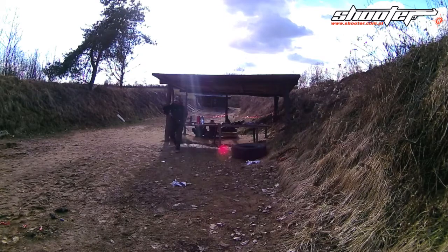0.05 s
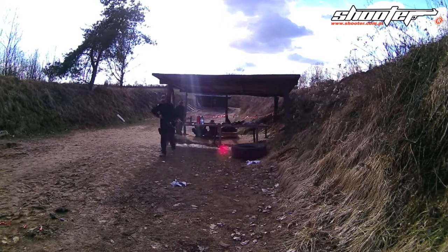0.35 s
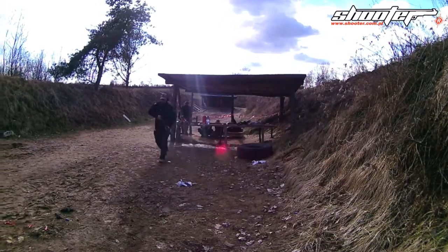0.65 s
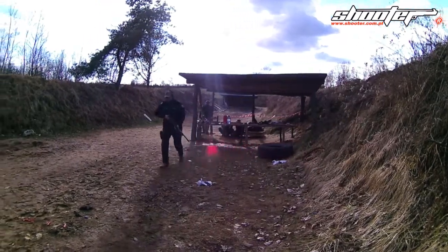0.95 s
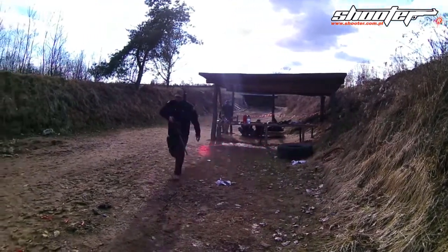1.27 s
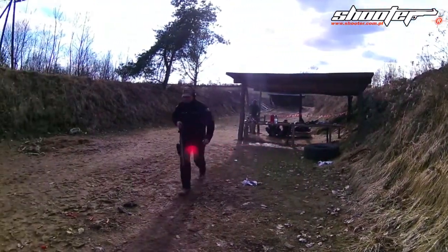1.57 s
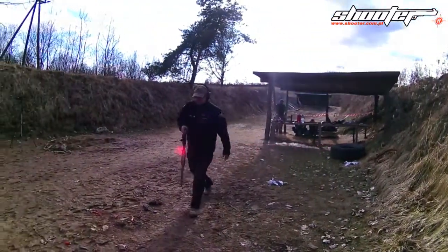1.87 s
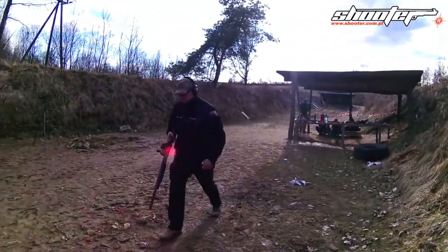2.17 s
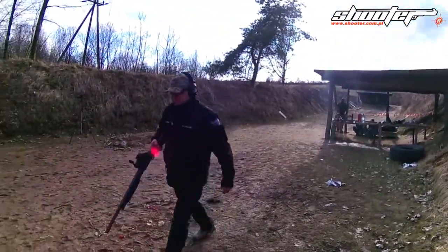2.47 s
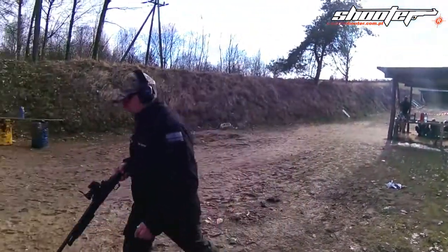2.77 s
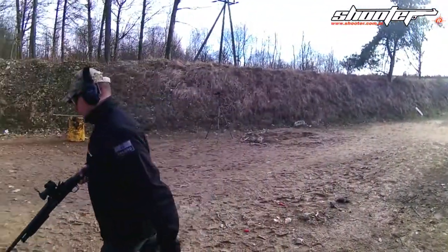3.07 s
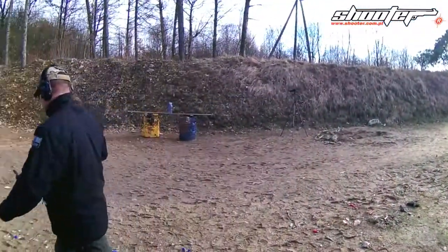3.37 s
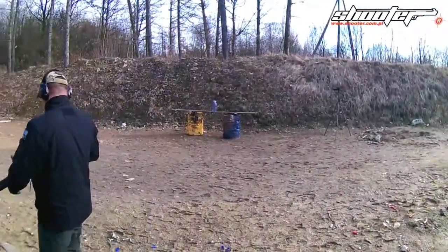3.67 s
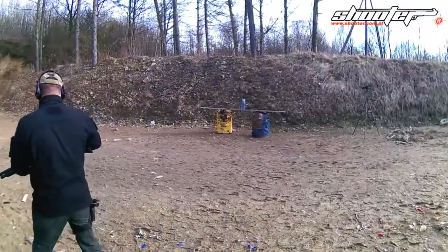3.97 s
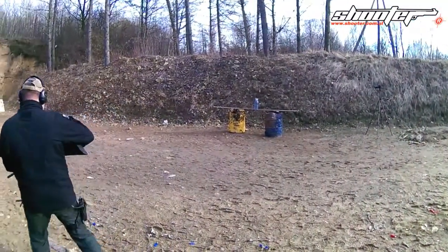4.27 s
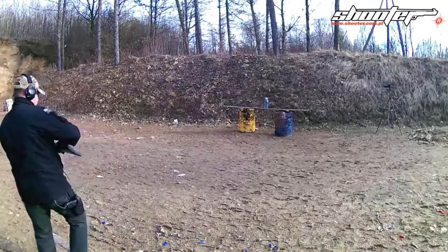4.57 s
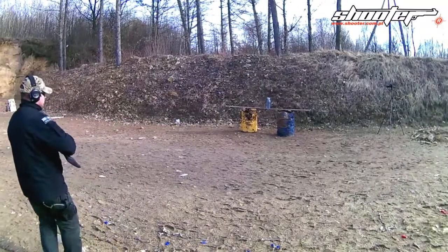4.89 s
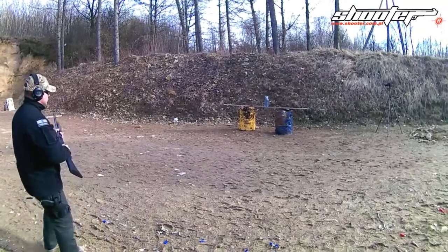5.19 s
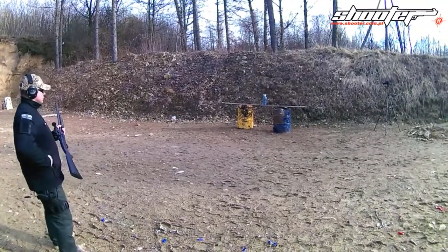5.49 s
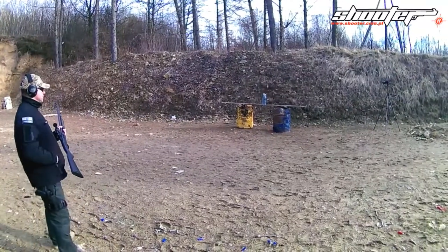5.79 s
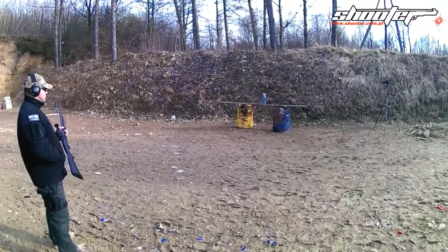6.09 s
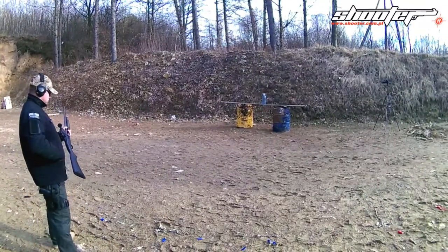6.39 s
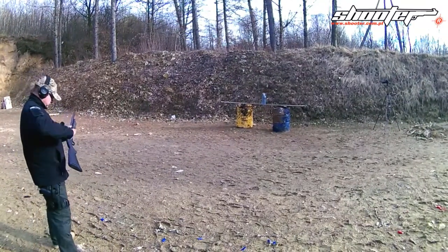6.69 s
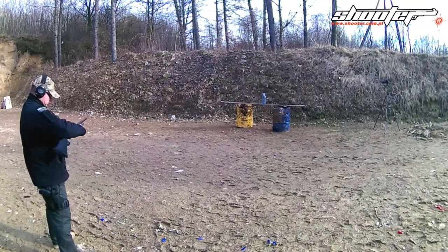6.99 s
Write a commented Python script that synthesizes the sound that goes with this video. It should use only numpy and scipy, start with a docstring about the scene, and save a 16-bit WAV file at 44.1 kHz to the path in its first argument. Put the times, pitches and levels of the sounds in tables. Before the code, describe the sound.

Outdoors, a rubbing camera mount ticks irregularly over faint gritty footsteps, followed by a few dull clacks of a pump-action gun.

```python
"""A quiet outdoor range: a man walks over crunching grit past a turning camera, then handles a shotgun.
The camera's mount rubs, sticks and slips in sharp ticks, and its stand bumps as the turn stops.
The man's heels thud, then the pump-action gun clacks: each blow makes a solid body ring briefly.
Cloth rustles, rubbing parts squeak, and mount and gun give small dry clicks. Underneath lie still air,
a breeze's low rumble, a far machine's hum, the camera's thin whine and a faint, high fizz."""
import sys
import numpy as np
from scipy import signal
from scipy.fft import rfft, irfft
from scipy.io import wavfile
from scipy.ndimage import uniform_filter1d

SR = 44100
rng = np.random.default_rng(int(sys.argv[2]) if len(sys.argv) > 2 else 0)


def materialize(psi):
    """Save the field psi as 16-bit PCM at rate SR to the path in sys.argv[1].

    A 1-D psi becomes a single channel; in a 2-D psi each row is a channel.
    """
    bounded = np.clip(np.atleast_2d(psi).T, -1, 1)
    quanta = np.round(bounded * 32767).astype(np.int16)
    wavfile.write(sys.argv[1], SR, quanta)


N = 310464

# tone colour of still air, the breeze's rumble and the rubbing mount (f/Hz, relative level/dB)
AIR_COLOUR = [(59, -21.5), (100, -1), (304, -7), (407, -10.5), (492, -10), (535, -13.5), (582, -14),
              (718, -15.5), (797, -14), (2050, -22.5), (12200, -31), (15000, -30)]
RUMBLE_COLOUR = [(11, -28), (18, -1.5), (54, -2), (67, 2.5), (86, -14.5), (130, -20), (170, -42),
                 (290, -120)]
DRAG_COLOUR = [(250, -9), (400, 1), (850, -5.5), (1400, -8), (3000, -9), (5100, -19), (6500, -22),
               (12000, -27)]
# tones of a far machine (f/Hz, level/dB)
HUM_TONES = [(53.8, -68.5), (103, -68)]
# rustles of jacket and sling (t/s, half length/s, low f/Hz, high f/Hz, level/dB)
RUSTLES = [(.09, 0.016, 150, 490, -59.5), (.33, 0.011, 400, 1500, -56.5), (1.72, .02, 2100, 3300, -64),
           (3.7, 0.044, 395, 2630, -56), (4.13, 0.06, 560, 1500, -59), (5.27, 0.07, 1300, 2880, -69),
           (6.3, 0.034, 500, 2100, -63), (6.9, 0.23, 1000, 2130, -69.5)]
# crunches of grit (t/s, f/Hz, level/dB)
CRUNCHES = [(.1, 3250, -62), (.33, 3160, -62.5), (1.167, 5170, -61.5), (1.47, 5700, -61.5),
            (1.77, 6950, -68.5), (2.09, 5000, -69.5), (2.43, 6500, -62.5), (2.534, 4240, -47.5),
            (2.735, 7500, -63.5), (3.087, 7000, -55), (3.437, 6800, -60)]
# squeaks of rubbing parts (t/s, half length/s, f/Hz, relative level/dB)
SQUEAKS = [(.135, 0.043, 1890, -66), (0.365, 0.078, 1880, -68), (3.7, 0.028, 398, -54),
           (5.645, .025, 1135, -67), (5.848, .04, 1135, -65.5), (6.35, 0.013, 546, -55.5),
           (6.526, 0.011, 530, -59)]
# the four pitch ranges of a blow: thud, clack, ring, crack (low f/Hz, high f/Hz)
RANGES = [(120, 700), (700, 1400), (1400, 2400), (2400, 9000)]
# slips of the mount and knocks of the gun (t/s, level/dB, brightness/dB: crack's gain over thud)
MOUNT_TICKS = [(.43, -59, 2), (.468, -33.5, 9.5), (.538, -41.5, 2.5), (.878, -37, 1.5), (1.553, -37, 2),
               (1.621, -44.5, -0.5), (2.2562, -40, -2.5), (2.3484, -54, -6), (2.4364, -43, -3.5),
               (2.524, -44, -2.5), (2.5771, -43.5, -1), (2.731, -39.5, -1), (2.8012, -44.5, 1.5),
               (3.019, -40, -1.5)]
GUN_CLACKS = [(5.0419, -48, -5), (5.1469, -48, 5.5), (5.2002, -52.5, -2), (5.2282, -52.5, 6.5),
              (5.3559, -33.5, -0.5), (5.396, -61, 18)]
# make-up of an ordinary tick and of the gun's hardest knock (thud/dB, clack/dB, ring/dB, crack/dB)
MOUNT_BALANCE = [0, -4.5, -3.5, -7.5]
GUN_BALANCE = [0, -3, -13, -18]
# small dry clicks, mostly of the camera's mount and the handled gun (t/s, f/Hz, peak level/dB)
CLICKS = [(.616, 1390, -46), (.799, 950, -49), (2.102, 2200, -47.5), (2.3496, 1130, -32),
          (2.758, 3000, -42), (2.919, 3100, -49), (3.725, 885, -43), (5.6235, 1200, -44.5),
          (6.7909, 1710, -44)]
# bump of the stand (t/s, thud/dB, clack/dB, ring/dB, crack/dB)
STAND_BUMPS = [(3.4255, -39.5, -42, -49, -62)]
# tones of the camera's electronics (start t/s, end t/s, f/Hz, relative level/dB)
WHINE_TONES = [(3.43, 4.66, 13157, -80), (3.43, 4.66, 14497, -82), (4.66, 7.1, 15478, -79.5)]
# the man sets his feet down (t/s, level/dB)
HEEL_THUDS = [(3.793, -51.5), (3.855, -57), (3.893, -61)]
# modes, the tones a struck body rings with: mount's shell, stand, heel on earth, gun's stock and frame
# (f/Hz, relative level/dB, time to fade by 60 dB/s)
MOUNT_MODES = [(295, -21, 0.043), (327, -2.5, 0.064), (382.8, 4.5, 0.041), (473, -3, 0.055),
               (573, -32, 0.24), (653, -13.5, 0.093), (831.5, 4, 0.059), (1045, 8.5, 0.036),
               (1123, -9.5, 0.11), (1330, -2, 0.014), (1470, 1, 0.022), (1894, 2, 0.043),
               (1988, 11.5, 0.0098), (2600, -14, 0.0051), (2890, -9.5, 0.046), (3225, 13, 0.008),
               (3776, -7, 0.028), (4415, 0.5, 0.015), (4680, -1.5, 0.015), (6020, -14, 0.018),
               (7030, -22, 0.011)]
STAND_MODES = [(178, -14.5, 0.37), (203, 2.5, 0.066), (336, -5, 0.11), (407, -2.5, 0.1), (521, -8, 0.13),
               (773, -8, .04), (920, 3, 0.049), (1460, -3, 0.036), (1650, 1, 0.026), (1990, 7, 0.013),
               (2830, 0, 0.015)]
HEEL_MODES = [(173, -3.5, 0.12), (205, 2.5, 0.05)]
GUN_MODES = [(236, 3, 0.076), (266.4, 4.5, 0.075), (400, -11.5, 0.17), (471.6, 4, .08), (611, 5.5, 0.045),
             (646, -17.5, 0.27), (754, -10, 0.083), (787, -4, 0.041), (1060, 3.5, 0.036),
             (1127, 3.5, 0.041), (1638, -10.5, 0.048), (1956, -7.5, 0.041), (2110, -2.5, 0.019),
             (2680, 7, 0.03), (2990, 4.5, 0.023), (3470, 0, .03), (4230, 0.5, 0.019)]

SWING_FROM_S, SWING_UNTIL_S = 2.07, 3.23  # the fast part of the camera's turn


def undb(db):
    """Turn decibels into a number to multiply by."""
    return 10 ** (np.asarray(db) / 20)


def unit(x):
    """Scale a signal to an average strength (rms) of 1."""
    return x / np.sqrt(np.mean(x ** 2) + 1e-20)


def curve(rows):
    """Join (t/s, value) points with straight lines."""
    return np.interp(np.arange(N) / SR, *np.transpose(rows))


def band(x, low_hz, high_hz):
    """Keep the sound between two pitches."""
    limits = np.clip([low_hz, high_hz], 10, SR / 2 - 1000)
    return signal.sosfilt(signal.butter(3, limits, "band", fs=SR, output="sos"), x)


def edges(hz, octaves):
    """Low and high edge of a band around a pitch."""
    return hz * 2 ** (-octaves / 2), hz * 2 ** (octaves / 2)


def coloured(points, size=N):
    """Noise of strength 1 whose tone colour follows (f/Hz, level/dB) points."""
    hz, db = np.transpose(points)
    gain = undb(np.interp(np.log(np.fft.rfftfreq(size, 1 / SR) + 1), np.log(hz), db))
    return unit(irfft(rfft(rng.standard_normal(size)) * gain, size))


def wander(rate):
    """A random drift of strength 1 that takes a new course `rate` times a second."""
    hold = max(int(SR / rate), 1)
    steps = np.repeat(rng.standard_normal(N // hold + 1), hold)
    return unit(uniform_filter1d(steps, hold)[:N])


def swishes(events, grain_rate, grain_db):
    """Short swells of grainy noise, like many tiny, uneven touches."""
    t = np.arange(N) / SR
    grains = rng.standard_normal(N) * undb(grain_db * wander(grain_rate))
    return sum(undb(db) * np.exp(-.5 * ((t - s) / half_s) ** 2) * unit(band(grains, low_hz, high_hz))
               for s, half_s, low_hz, high_hz, db in events)


def share_out(events, balance_db, clack_db):
    """Share each blow's level among the four ranges, tilt it by brightness and adjust the clack."""
    start, db, bright_db = np.transpose(events)
    tilt_db = np.outer(bright_db, np.linspace(-.5, .5, len(RANGES)))
    levels_db = db[:, None] + np.array(balance_db) + tilt_db
    levels_db[:, 1] += clack_db
    return np.column_stack([start, levels_db])


def blows(events, modes, rise_s, travel_s, detune, scrape_s, scrape_db, scrape_step_db, scrape_colour):
    """Each blow makes a body ring, while the touching surfaces scrape for a moment."""
    size, onset = int(.3 * SR), int(.04 * SR)  # a blow's level is set over its onset
    t = np.arange(size) / SR
    out = np.zeros(N + size)
    for start, *levels_db in events:
        scrape = coloured(scrape_colour, size) * (1 - np.exp(-t / rise_s)) * np.exp(-t / scrape_s)
        hit = np.zeros(size)
        for step, ((low_hz, high_hz), db) in enumerate(zip(RANGES, levels_db)):
            ring = np.zeros(size)
            for hz, mode_db, t60 in modes:
                if low_hz <= hz < high_hz:
                    # high tones cross a bending body faster: the tick arrives before the thud
                    age = np.maximum(t - travel_s / np.sqrt(hz / 1000), 0)
                    tone = np.sin(2 * np.pi * hz * (1 + detune * rng.standard_normal()) * age)
                    rise = 1 - np.exp(-age / rise_s)
                    fade = np.exp(-np.log(1000) * age / t60)
                    ring += undb(mode_db) * tone * rise * fade
            rasp = band(scrape, low_hz, high_hz)
            rasp_gain = undb(scrape_db + scrape_step_db * step)  # higher ranges hold more scrape
            part = ring / ring[:onset].std() + rasp_gain * rasp / rasp[:onset].std()
            hit += undb(db) * part / part[:onset].std()
        out[int(start * SR):][:size] += hit
    return out[:N]


def air():
    """Still air is a soft, almost steady hush."""
    return coloured(AIR_COLOUR) * undb(-60 + 0.22 * wander(6.5))


def rumble(turn_at_s=3.33, turn_takes_s=.15, sheltered_db=-71, breeze_db=-61.5):
    """A low rumble grows as the microphone comes round into the breeze."""
    db = curve([(turn_at_s, sheltered_db), (turn_at_s + turn_takes_s, breeze_db)])
    return coloured(RUMBLE_COLOUR) * undb(db)


def hum(end_s=4.1, fade_s=0.33):
    """A far machine's wavering hum fades as the microphone turns away."""
    tones = np.zeros(N)
    for hz, db in HUM_TONES:
        wavering_hz = hz * (1 + 0.0243 * wander(10))
        tones += undb(db) * np.sqrt(2) * np.sin(2 * np.pi * np.cumsum(wavering_hz) / SR)
    return tones * curve([(end_s - fade_s, 1), (end_s, 0)])


def mount_drag(creep_db=-69.5, swing_db=-61, speed_up_s=0.41, settle_db_per_s=13.5):
    """The mount rubs as it creeps, swings round and comes to rest; faster is louder."""
    settled_s = np.maximum(np.arange(N) / SR - SWING_UNTIL_S, 0)
    db = curve([(SWING_FROM_S, creep_db), (SWING_FROM_S + speed_up_s, swing_db)])
    db -= settle_db_per_s * settled_s
    return coloured(DRAG_COLOUR) * undb(db + 2.1 * wander(27.02) + 2.3 * wander(400))


def rustles():
    """Jacket and sling brush in soft swells."""
    return swishes(RUSTLES, grain_rate=200, grain_db=2.5)


def crunches(shortest_half_s=0.0093, doubling_db=17):
    """Grit gives way underfoot; a crunch that is softer by doubling_db lasts twice as long."""
    top_db = max(db for _, _, db in CRUNCHES)
    rows = [(s, shortest_half_s * 2 ** ((top_db - db) / doubling_db), *edges(hz, octaves=1.87), db)
            for s, hz, db in CRUNCHES]
    return swishes(rows, grain_rate=500, grain_db=4)


def squeaks():
    """Rubbing parts sing around one pitch, with a stutter."""
    rows = [(s, half_s, *edges(hz, octaves=.16), db) for s, half_s, hz, db in SQUEAKS]
    return swishes(rows, grain_rate=34, grain_db=0.5) * undb(2.5 * wander(50) - 1)


def mount_ticks(rebound_s=.1, bass_cut_hz=265):
    """The turning mount sticks and lets go in dry ticks; its small shell gives off no bass."""
    start, db, _ = np.transpose(MOUNT_TICKS)
    # a weaker tick close behind another is its rebound: the more it has lost, the hollower its clack
    close_behind = np.diff(start, prepend=-np.inf) < rebound_s
    lost_db = -np.diff(db, prepend=db[0])
    hollow_db = close_behind * np.clip(.5 * lost_db, 0, 7)
    slips = share_out(MOUNT_TICKS, MOUNT_BALANCE, hollow_db)
    ticks = blows(slips, MOUNT_MODES, rise_s=0.00095, travel_s=0.00065, detune=0.016,
                  scrape_s=0.0026, scrape_db=-4.5, scrape_step_db=1.5,
                  scrape_colour=[(170, -46), (300, 36), (3400, -1.5), (3900, -4.5), (4300, -4),
                                 (5400, -15), (9000, -29)])
    return signal.sosfilt(signal.butter(4, bass_cut_hz, "high", fs=SR, output="sos"), ticks)


def clicks(fade_s=.0018, stray_count=6, stray_hz=2600, stray_db=-53):
    """Small dry clicks, mostly of mount and gun; fainter strays fall by chance during the swing."""
    strays = [(rng.uniform(SWING_FROM_S, SWING_UNTIL_S), stray_hz, stray_db + 2 * rng.standard_normal())
              for _ in range(stray_count)]
    t = np.arange(int(.03 * SR)) / SR
    out = np.zeros(N + len(t))
    for s, hz, db in CLICKS + strays:
        snap = rng.standard_normal(len(t)) * np.exp(-t / fade_s)
        burst = band(snap, *edges(hz, octaves=1.3))
        out[int(s * SR):][:len(t)] += undb(db) * burst / abs(burst).max()
    return out[:N]


def stand_bump():
    """As the turn stops, the stand takes up its slack with a soft, low bump."""
    return blows(STAND_BUMPS, STAND_MODES, rise_s=0.0028, travel_s=0.00042, detune=0.0082,
                 scrape_s=0.0088, scrape_db=-13.5, scrape_step_db=2.5,
                 scrape_colour=[(150, 3), (2000, -23), (4000, -1), (9000, -19)])


def whine(flutter_hz=55, trim_db=-0.5):
    """The camera's electronics give off thin, very high, fluttering tones."""
    t = np.arange(N) / SR
    tones = sum(undb(db) * np.sqrt(2) * np.sin(2 * np.pi * hz * t) * (t > on) * (t < off)
                for on, off, hz, db in WHINE_TONES)
    flutter = 1 + 0.76 * np.sin(2 * np.pi * flutter_hz * t) + .3 * wander(80)
    return undb(trim_db) * tones * flutter


def fizz(count=9, from_s=3.6, every_s=0.34, jitter_s=0.028, first_db=-66.5, fade_db_per_s=2.5):
    """Short, very high fizzes come at a loosely even pace and slowly weaken."""
    ages = every_s * np.arange(count) + jitter_s * rng.standard_normal(count)
    rows = [(from_s + age, .014, 10000, 15500, first_db - fade_db_per_s * age) for age in ages]
    return swishes(rows, grain_rate=400, grain_db=1.5)


def heel_thuds():
    """Heels on packed earth give only a low, short boom."""
    return blows(HEEL_THUDS, HEEL_MODES, rise_s=0.0046, travel_s=0, detune=0.037,
                 scrape_s=0.0089, scrape_db=-11.5, scrape_step_db=0,
                 scrape_colour=[(200, -11), (700, -10)])


def gun_clacks(bass_cut_hz=170):
    """The gun's stock and metal frame knock with a heavy, dull clack."""
    _, db, _ = np.transpose(GUN_CLACKS)
    clack_db = 0.34 * (db - db.max())  # softer blows stir the frame's clack less than the stock
    knocks = share_out(GUN_CLACKS, GUN_BALANCE, clack_db)
    clacks = blows(knocks, GUN_MODES, rise_s=0.0018, travel_s=0.00073, detune=0.0078,
                   scrape_s=0.0064, scrape_db=-8.5, scrape_step_db=2.5,
                   scrape_colour=[(150, -11), (230, 22), (2800, -3), (5000, -25), (9000, -27)])
    return signal.sosfilt(signal.butter(3, bass_cut_hz, "high", fs=SR, output="sos"), clacks)


def scene():
    """All the sounds meet at one microphone in the open air."""
    man = crunches() + heel_thuds() + rustles()
    knocks = mount_ticks() + stand_bump() + gun_clacks()
    small_sounds = squeaks() + clicks() + fizz() + mount_drag()
    background = air() + rumble() + hum() + whine()
    return (man + knocks + small_sounds + background)[None]


def record(dry):
    """A steep filter cuts off the very highest treble."""
    top_hz = 15850
    return signal.sosfilt(signal.ellip(10, .2, 70, top_hz, fs=SR, output="sos"), dry)


dry = scene()
out = record(dry)
materialize(out)
```